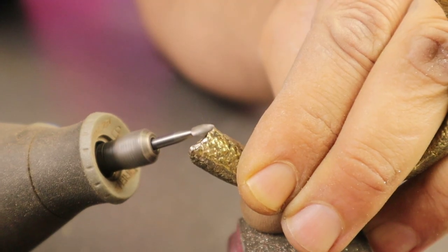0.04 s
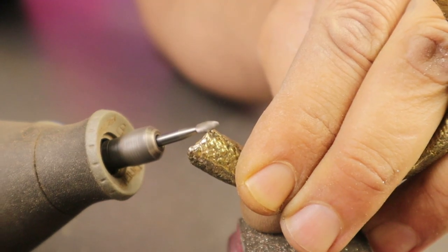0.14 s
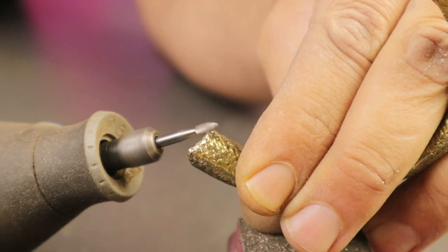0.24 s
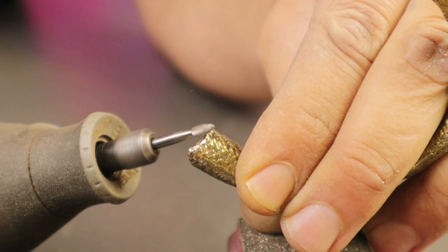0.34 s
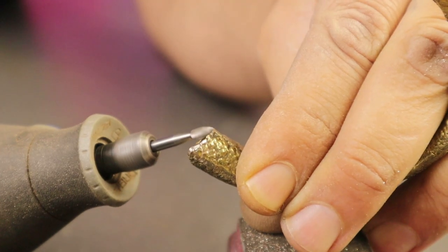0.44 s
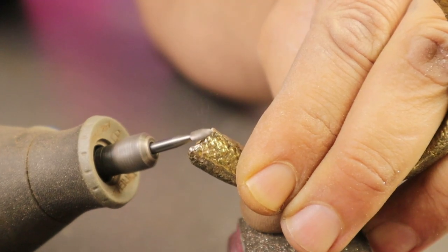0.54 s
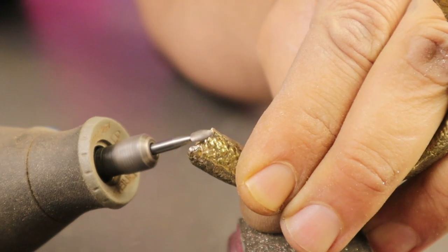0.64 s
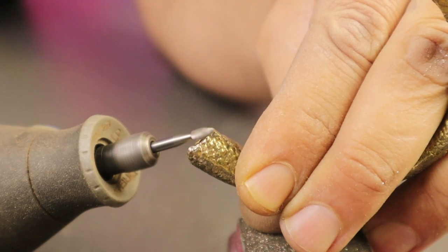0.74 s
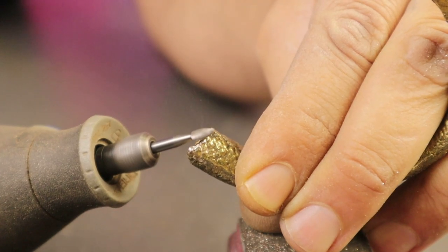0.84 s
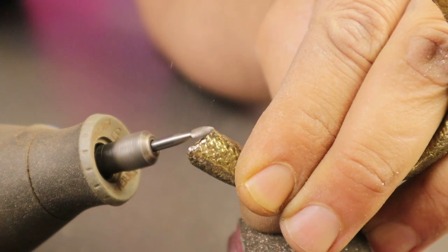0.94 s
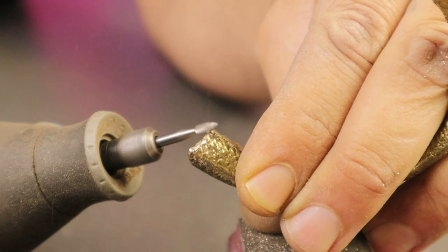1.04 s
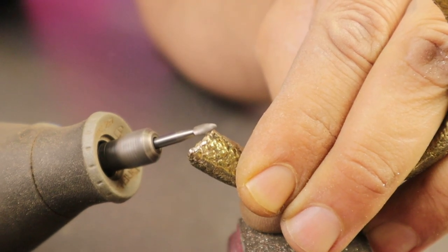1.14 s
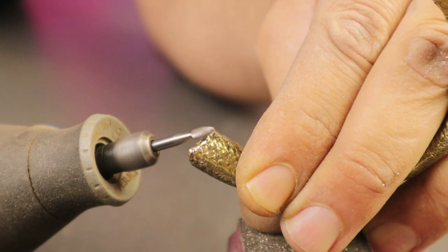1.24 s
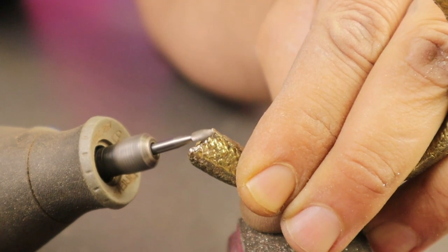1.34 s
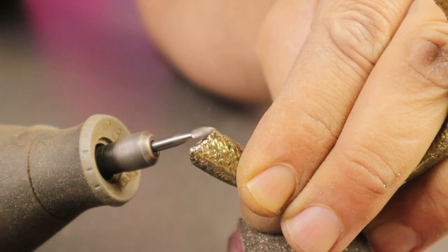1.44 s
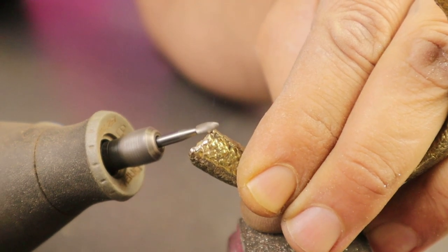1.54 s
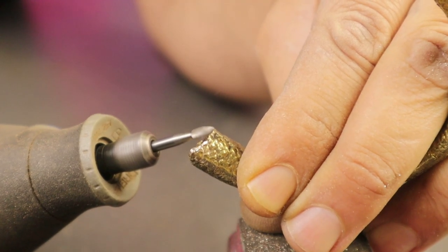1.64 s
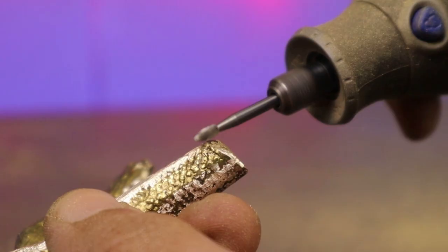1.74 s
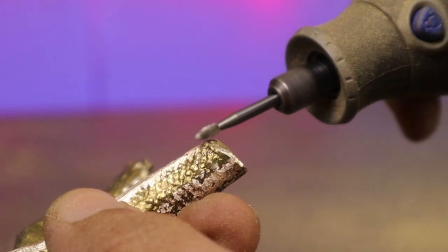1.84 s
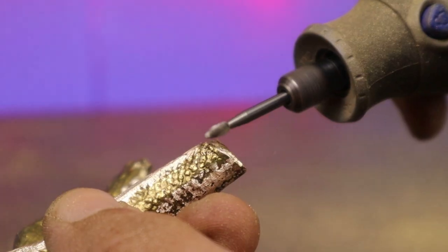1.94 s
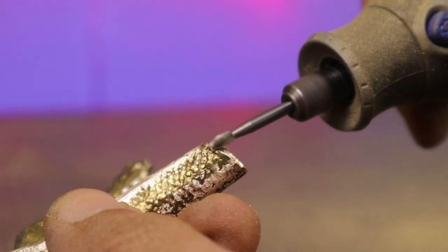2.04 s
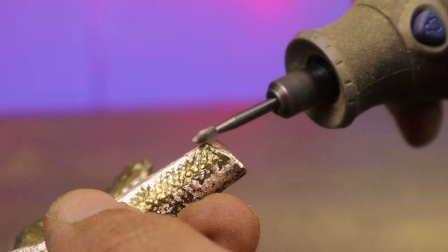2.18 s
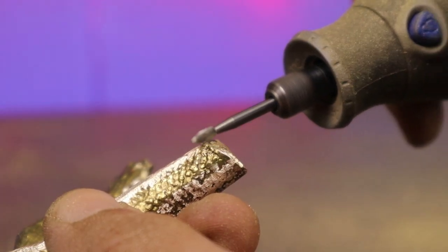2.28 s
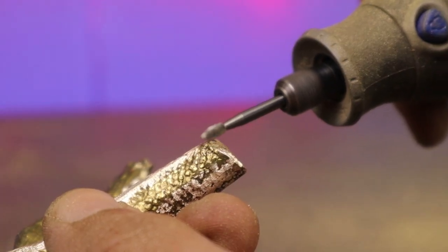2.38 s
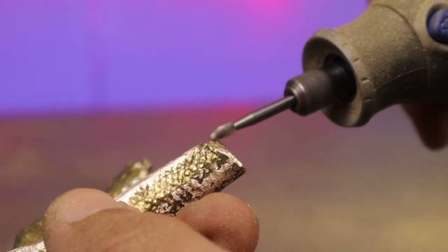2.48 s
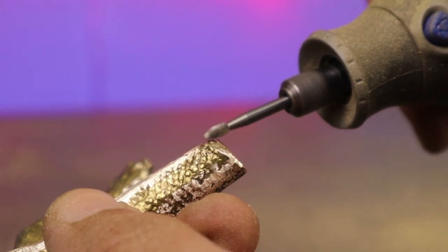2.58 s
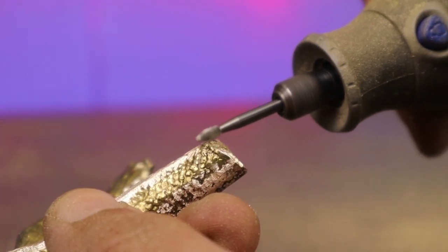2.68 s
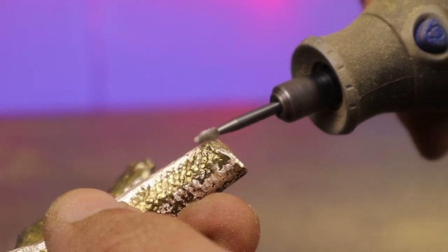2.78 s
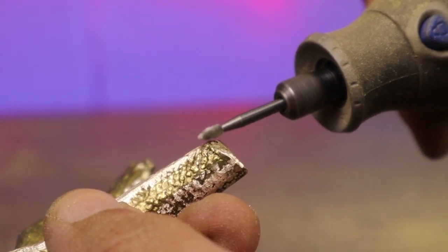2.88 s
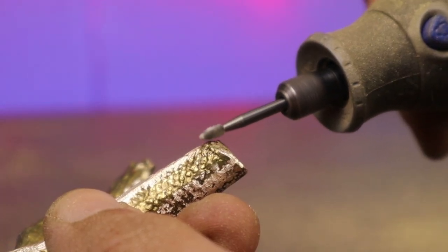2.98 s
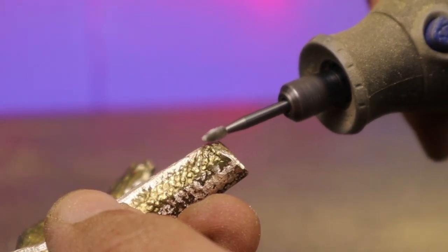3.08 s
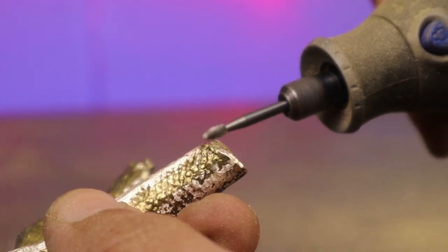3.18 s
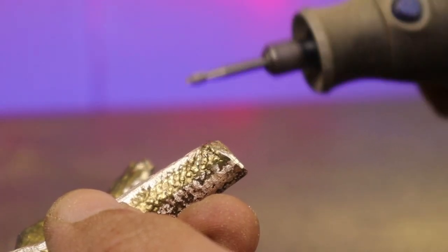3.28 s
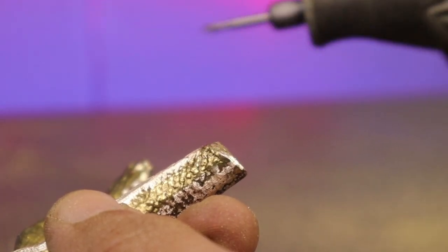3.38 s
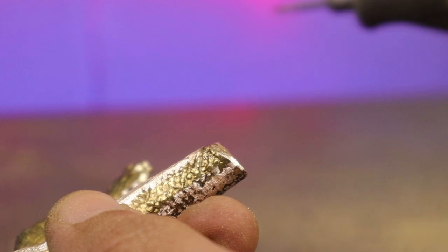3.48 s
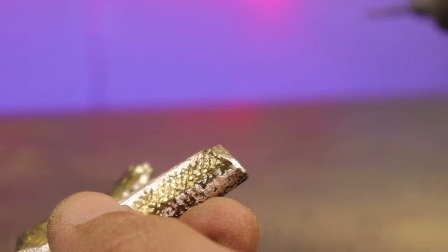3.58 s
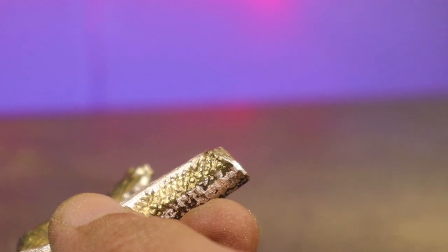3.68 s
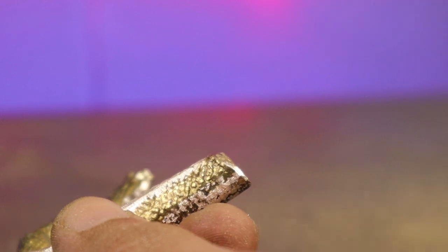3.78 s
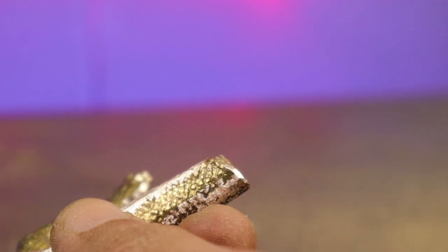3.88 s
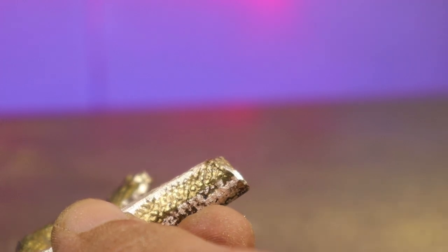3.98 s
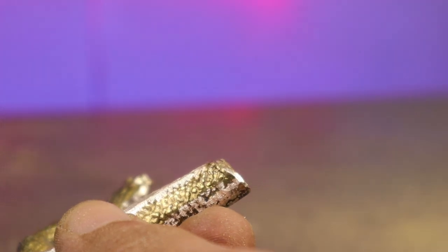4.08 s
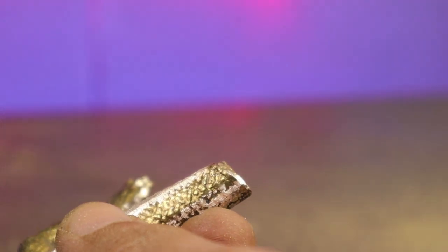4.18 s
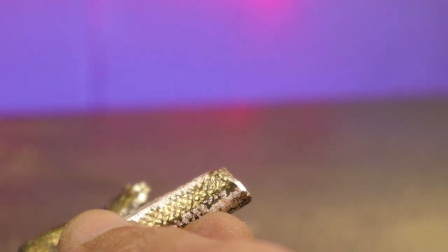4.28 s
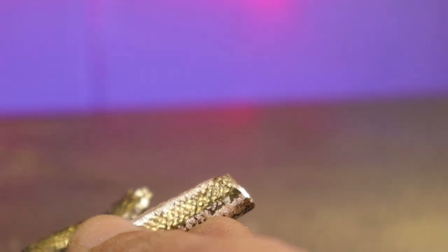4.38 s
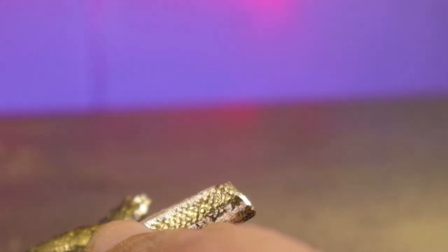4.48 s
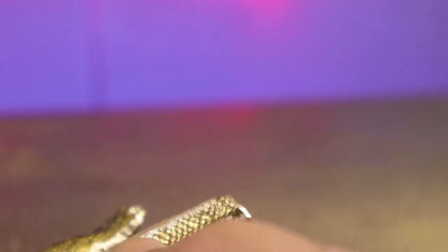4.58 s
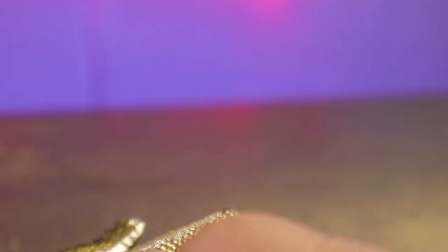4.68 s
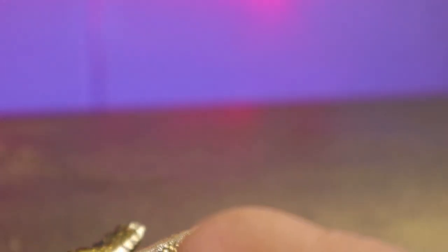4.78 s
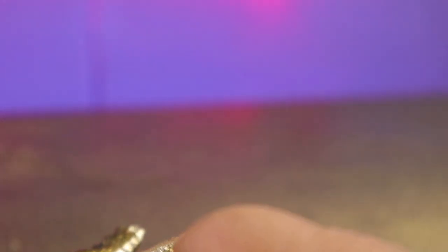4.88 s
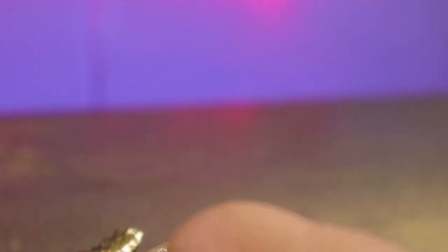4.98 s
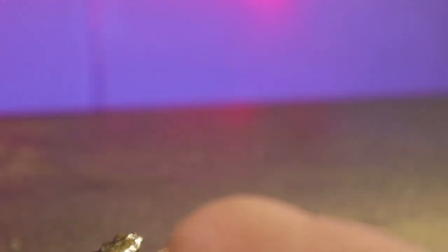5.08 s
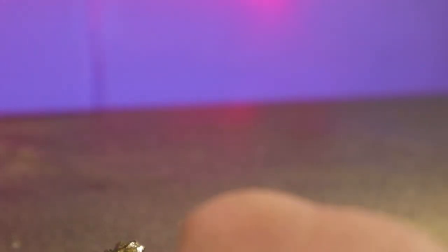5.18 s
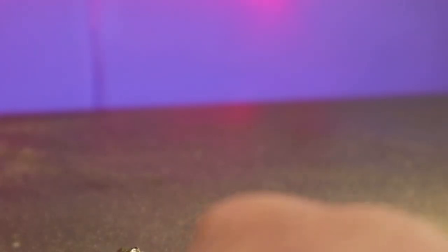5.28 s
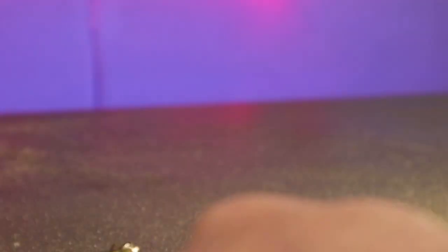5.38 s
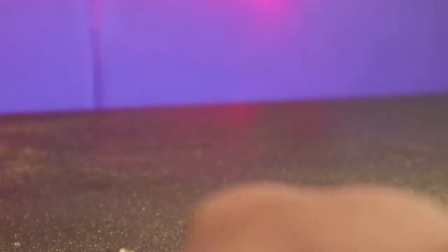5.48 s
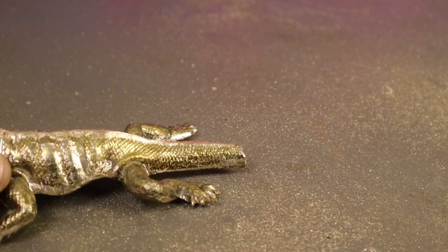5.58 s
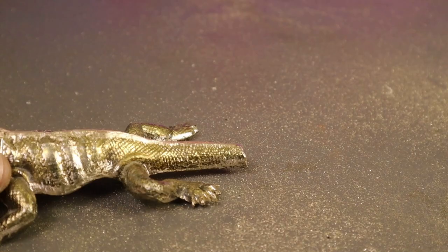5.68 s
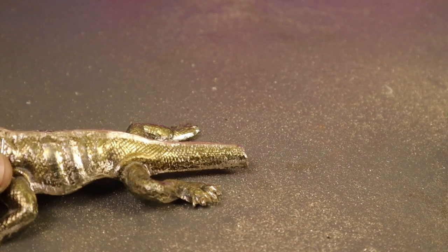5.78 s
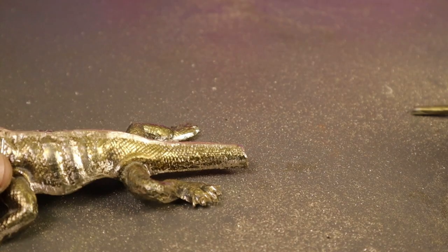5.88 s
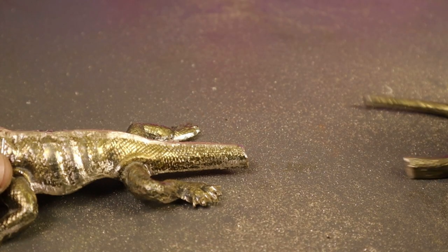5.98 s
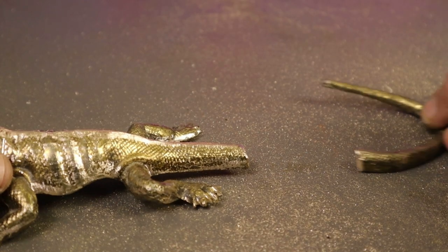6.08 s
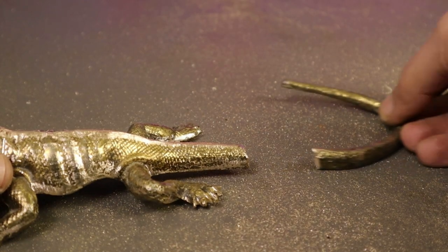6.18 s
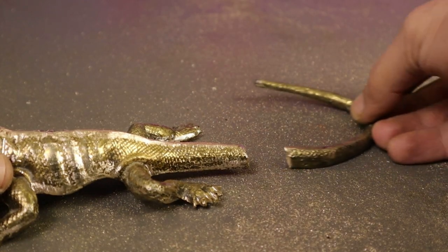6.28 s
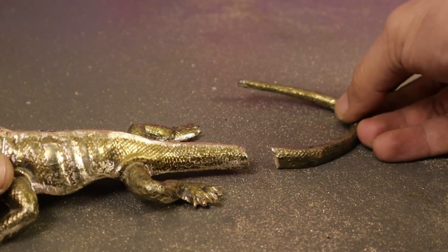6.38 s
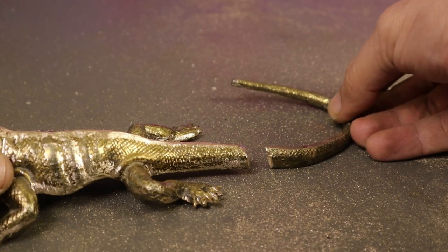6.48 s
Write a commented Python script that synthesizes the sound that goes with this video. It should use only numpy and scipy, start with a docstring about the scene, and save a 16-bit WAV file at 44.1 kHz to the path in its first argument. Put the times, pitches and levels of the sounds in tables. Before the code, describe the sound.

A small, fairly dry workshop, heard close. From 0 s a running handheld rotary tool grinds a brass figure: a loud, rough buzz near 270 turns per second, with treble rasp, metallic ringing and short squeals, pressed in uneven pushes of a tenth to a quarter of a second. A low bump sits under the start. Around 1.75 s the grip changes with a tiny break; the grinding resumes slightly higher, more ringing, with shrill singing tones, strongest near 1.9 and 3.0 s. At about 3.2 s the burr lifts off, leaving steady whine, fan hiss and faint electrical buzz. Switched off at 4.05 s, it glides down in pitch and fades by about 5.5 s. A soft padded thud comes at 4.95 s over quiet room tone. From 5.6 s metal scrapes in short gritty slides, with light knocks growing into hard, rapid clacks around 6.0-6.25 s, and a last few near 6.4 s.

```python
"""A small workshop: a handheld rotary tool grinds the cut end of a small brass figure, held first one way, then another.
The burr strikes once a turn, tears off chips and makes the figure ring; harmonics of the speed sing out at times.
Fan noise, whine and mains buzz come from the tool, which is lifted off, switched off and coasts down; soft bumps
mark hands and tool on the bench. Then figure and loose tail slide over the bench as filtered slips and knock on it,
exciting its decaying modes. A faint coloured noise is the room tone."""
import sys
import numpy as np
from scipy import signal
from scipy.fft import rfft, irfft, next_fast_len
from scipy.io import wavfile
from scipy.ndimage import uniform_filter1d

SR = 44100
rng = np.random.default_rng(int(sys.argv[2]) if len(sys.argv) > 2 else 0)


def pcm_store(signal):
    """Save signal as 16-bit PCM."""
    levels = np.round(np.clip(np.atleast_2d(signal), -1, 1) * 32767)
    wavfile.write(sys.argv[1], SR, levels.astype(np.int16).T)


N = 287973
T = np.arange(N) / SR

LIFT_S, SWITCH_OFF_S = 3.25, 4.06
CUT_ATTACK_S, CUT_RELEASE_S = 0.017, 0.018   # pushes, squeals and locked tones


def from_db(db):
    """Decibels to gain."""
    return 10 ** (np.asarray(db) / 20)


def rms_one(x):
    """Scale to rms 1."""
    return x / np.sqrt(np.mean(x ** 2) + 1e-20)


def steady(x):
    """Divide a sound by its running rms over 59 ms."""
    return x / np.sqrt(np.abs(uniform_filter1d(x ** 2, size=2600)) + 1e-12)


def in_time(rows):
    """A curve of (time, value) at every sample."""
    s, values = np.transpose(rows)
    return np.interp(T, s, values)


def at_hz(points, hz):
    """Read a spectrum on a log-frequency axis."""
    f, db = np.transpose(points)
    return np.interp(np.log(np.maximum(hz, 1)), np.log(f), db)


def colour(x, spectrum):
    """Causal (minimum-phase) filter with the given spectrum."""
    size = 2 * next_fast_len(N // 2 + 4096)
    bins_hz = np.arange(size // 2 + 1) * SR / size
    cepstrum = irfft(np.log(from_db(at_hz(spectrum, bins_hz))))
    # fold the cepstrum to positive time
    cepstrum[1:size // 2] *= 2
    cepstrum[size // 2 + 1:] = 0
    return irfft(rfft(x, size) * np.exp(rfft(cepstrum)))[:N]


def noise():
    """White noise."""
    return rng.standard_normal(N)


def low_pass(x, hz):
    """Second-order low-pass."""
    return signal.sosfilt(signal.butter(2, hz, fs=SR, output="sos"), x + 1e-18)


def split(x, hz, order=4):
    """The parts of a sound below and above a frequency."""
    return [signal.sosfilt(signal.butter(order, hz, kind, fs=SR, output="sos"), x + 1e-18)
            for kind in ("low", "high")]


def drift(rate_hz):
    """Slow chance with rms 1."""
    return rms_one(np.interp(T * rate_hz, np.arange(8000), rng.standard_normal(8000)))


def waver(db, rate_hz):
    """A gain that wanders by so many dB (standard deviation)."""
    steps = np.arange(int(N / SR * rate_hz) + 2)
    return np.interp(T * rate_hz, steps, from_db(db * rng.standard_normal(len(steps))))


def tone(cycles):
    """A cosine that follows a count of cycles."""
    return np.cos((2 * np.pi * (cycles - np.floor(cycles))).astype(np.float32))


def resonate(x, hz, width_hz):
    """One resonance with a peak gain of about 1."""
    r = np.exp(-np.pi * width_hz / SR)
    zeros = np.array([1, 0, -1]) * (1 - r * r) / 2
    poles = [1, -2 * r * np.cos(2 * np.pi * hz / SR), r * r]
    return signal.lfilter(zeros, poles, x + 1e-18)


def ring(clicks, hz, t60_s):
    """A unit click starts a decaying sine of initial height 1."""
    r, w = from_db(-60 / (t60_s * SR)), 2 * np.pi * hz / SR
    return signal.lfilter([0, np.sin(w)], [1, -2 * r * np.cos(w), r * r], clicks + 1e-18)


def clicks_at(times_s, gains):
    """Single-sample clicks."""
    out = np.zeros(N)
    out[np.round(np.asarray(times_s) * SR).astype(int)] = gains
    return out


def fade(clicks, t60_s):
    """Each click starts an exponentially decaying envelope."""
    return signal.lfilter([1], [1, -from_db(-60 / (t60_s * SR))], clicks + 1e-18)


def between(start_s, end_s):
    """Gate with short ramps."""
    rise = np.clip((T - start_s) / 0.0045 + .5, 0, 1)
    fall = np.clip((end_s - T) / .01 + .5, 0, 1)
    return rise * fall


def held(spans, attack_s, release_s):
    """Gain of events (start, end, dB) that rise, hold and die away; the strongest prevails."""
    t, out = T[::20], 1e-6
    for start, end, db in spans:
        rise = np.clip((t - start) / attack_s, 0, 1)
        decay = np.exp(-np.maximum(t - end, 0) / release_s)
        out = np.maximum(out, from_db(db) * rise * decay)
    return np.interp(T, t, out)


def workshop(x, wet_db):
    """Dense reflections of the small room: a decaying noise tail follows the direct sound."""
    t60_s = 0.19
    t = T[:SR // 2]
    tail = rng.standard_normal(len(t)) * from_db(-60 * t / t60_s) * (t > .004)
    return x + from_db(wet_db) * signal.oaconvolve(x, tail / np.linalg.norm(tail))[:N]


def room_tone():
    """Steadily coloured background noise with a slowly changing level."""
    # background level: (time [s], level [dB])
    level_points = [(0, -51.5), (3.4, -57.5), (4.1, -51), (4.9, -50), (5.5, -50), (5.7, -53)]
    # background spectrum: (frequency [Hz], density [dB per Hz])
    spectrum = [(20, -34.5), (60, -3), (100, -6.5), (140, 1), (200, -6), (400, -12), (1800, -23),
                (3000, -27.5), (15800, -34)]
    return from_db(in_time(level_points)) * rms_one(colour(noise(), spectrum))


def bumps():
    """Padded blows of hands and tool on the bench: short thud and tail; the first shakes the bench deeply."""
    # blows: (time [s], level [dB], low-pass corner [Hz])
    blows = [(0.036, -20, 170), (0.073, -25, 400), (1.788, -26, 330), (4.951, -19.5, 600),
             (4.957, -24, 4000), (4.964, -25, 4000), (4.978, -27.5, 2000)]
    # thud spectrum: (frequency [Hz], density [dB per Hz])
    thud_spectrum = [(29, -42), (50, -29.5), (268, -8), (338, -4.5), (825, -15), (898, -19), (1210, -10.5),
                     (1770, -24.5), (2010, -19.5), (8000, -39), (10400, -63.5), (17600, -120)]
    thud, out = rms_one(colour(noise(), thud_spectrum)), 0
    for s, db, corner_hz in blows:
        blow = clicks_at([s], [from_db(db)])
        envelope = fade(blow, 0.039) + 0.26 * fade(blow, 0.34)
        out = out + low_pass(thud * envelope, corner_hz)
    return out + ring(clicks_at([blows[0][0]], [from_db(-34.5)]), 60, 0.31)


def knocks():
    """Each brass knock cracks and rings the bench; hard ones drive the higher modes more, and the room answers."""
    # brass on the bench: (time [s], level [dB], hardness [dB])
    hits = [(5.641, -17.5, -18), (5.734, -13, -15), (5.946, -11, -9), (5.996, -4.5, -12), (6.0794, 1.5, 3),
            (6.094, -7.5, 1.5), (6.151, 1, -6), (6.165, -8, -5), (6.201, -11.5, 0), (6.217, -15, 5.5),
            (6.227, 0, -16), (6.372, -13, -7.5), (6.393, -6, -11), (6.42, -5, -23)]
    # bench modes: (frequency [Hz], level [dB], t60 [s])
    bench = [(338, -19.5, 0.11), (414, -8.5, 0.048), (580, -35, 0.09), (690, -17, 0.053),
             (874, -11.5, 0.042), (1150, -19, 0.037), (1810, -27, 0.082), (2350, -19, 0.06),
             (2780, -45, 0.074), (3890, -18, 0.018)]
    s, db, hard_db = np.transpose(hits)
    chance_db = 2 * rng.standard_normal((len(s), len(bench)))
    modes = 0
    for k, (hz, mode_db, t60_s) in enumerate(bench):
        strike_db = db + mode_db + chance_db[:, k] + hard_db * (hz > 1300)
        modes = modes + (-1) ** k * ring(clicks_at(s, from_db(strike_db)), hz, t60_s)
    hard = clicks_at(s, from_db(db + hard_db))
    crack = 0.61 * ring(hard, 2130, 0.0041) + .5 * ring(hard, 700, 0.015)
    crack = crack + 0.076 * low_pass(noise() * fade(hard, 0.01), 8800)
    room_spectrum = [(100, -11), (400, 3.5), (2500, -7), (5000, -26.5), (14000, -40)]   # (Hz, dB)
    room = rms_one(colour(noise(), room_spectrum)) * fade(hard, 0.24)
    return from_db(-5.5) * modes + crack + from_db(-23) * room


def sliding():
    """Rough brass catches on the gritty bench top in dense small slips and rings faintly."""
    # shoves over the bench: (start [s], end [s], level [dB])
    shoves = [(5.59, 5.69, -42.5), (5.617, 5.655, -37.5), (5.72, 5.77, -34), (5.8, 5.92, -31.5),
              (5.938, 6.1, -26.5), (6.15, 6.33, -27.5), (6.37, 6.465, -32), (6.495, 6.53, -42)]
    # friction spectrum: (frequency [Hz], density [dB per Hz])
    spectrum = [(47, -71), (80, -33.5), (449, -1), (714, -10), (871, -10), (1090, -17.5), (1930, -20.5),
                (3280, -30.5), (3740, -35.5), (8120, -39), (11600, -47.5), (13500, -46), (15800, -80)]
    # thin ring of the sliding metal: (frequency [Hz], width [Hz], level [dB])
    brass = [(3560, 120, -24.5), (6850, 180, -43), (9300, 43, -34.5), (13600, 170, -34)]
    slips_per_s = 1500
    treble_db, treble_follows = -11, 0.33   # treble share in the hardest shove; softer ones are duller
    level = held(shoves, attack_s=0.026, release_s=0.082)
    treble = from_db(treble_db) * (level / level.max()) ** treble_follows
    sizes = from_db(2 * np.minimum(rng.exponential(1, N), 4))
    slips = (rng.random(N) < slips_per_s / SR) * noise() * sizes
    friction = (rms_one(slips) + 0.83 * noise()) * waver(2.0, 70)
    low, high = split(colour(friction, spectrum), 1240)
    metal = sum(from_db(db) * rms_one(resonate(friction, hz, width_hz)) for hz, width_hz, db in brass)
    return level * (steady(low) + treble * steady(high) + metal)


def spindle():
    """Turns per second: varying under load, then braked by bearing friction and speed-proportional drag."""
    # powered speed in the first grip: (time [s], speed [turns/s])
    first_run = [(0.0, 277.8), (0.33, 277.7), (0.648, 269.5), (0.692, 264.0), (0.73, 271.5), (0.77, 266.7),
                 (1.32, 266.8), (1.344, 268.9), (1.75, 269.9)]
    # powered speed in the second grip: (time [s], speed [turns/s])
    second_run = [(1.8, 277.6), (2.006, 280.1), (2.33, 276.0), (2.544, 280.4), (2.582, 276.4),
                  (3.172, 277.5), (3.2, 273.2)]
    # powered speed off the metal: (time [s], speed [turns/s])
    free_run = [(3.34, 276.6), (3.566, 276.6), (4.0, 278.9)]
    friction_hz_per_s, drag_per_s = 168, .245
    powered_hz = in_time(np.vstack([first_run, second_run, free_run]))
    brake_hz = friction_hz_per_s / drag_per_s
    coasting = np.exp(-drag_per_s * np.maximum(T - SWITCH_OFF_S, 0))
    return np.maximum((powered_hz + brake_hz) * coasting - brake_hz, 1)


def fan(pace):
    """Turbulent fan air, whose mid band and hiss weaken as the rotor slows."""
    # air spectrum: (frequency [Hz], density [dB per Hz])
    spectrum = [(100, -38), (250, -19), (500, -6), (1050, 1.5), (1800, -3), (2800, -1.5), (4500, -4),
                (5400, -6.5), (7200, 1.5), (8800, -1), (10000, -7), (13000, -9), (15800, -12)]
    hiss_db, mid_power, hiss_power = -2.7, 0.34, 1   # powers of the speed
    rest, hiss = split(rms_one(colour(noise(), spectrum)), 4800)
    low, mid = split(rest, 1740)
    air = low + mid * pace ** mid_power + from_db(hiss_db) * pace ** hiss_power * hiss
    return air * waver(0.42, 65)


def rotor_whine(speed, turns):
    """Rotor and commutator tones at multiples of the speed, radiated by the housing."""
    # whine partials: (multiple of the speed [1], level [dB])
    partials = [(1, -22), (2, -14.5), (3, -31.5), (4, -38), (6, -27), (8, -8.5), (9, -1.5), (12, -28),
                (15, -17), (16, -18.5), (18, -10), (20, -29), (22, -22), (24, -10), (28, -20.5), (30, -26),
                (32, -21.5), (34, -21), (36, -15), (40, -19), (44, -20)]
    # how well the housing radiates: (frequency [Hz], gain [dB])
    housing = [(150, -10), (280, -2.5), (600, -35), (1500, -3), (2400, -16.5), (3450, 8.5), (4300, -6),
               (5000, -2), (5600, 0), (6700, -4.5), (7800, 9.5), (9200, 5), (11000, -14)]
    # one partial swells as the tool is turned in the hand: (start [s], end [s], rise [dB])
    swells = [(.5, 1.76, 10), (1.95, 2.1, 4), (3.31, 3.54, 12), (3.57, 4.2, 11), (4.86, 4.96, 13)]
    swelling_multiple = 18
    swell = np.maximum(1, held(swells, attack_s=0.039, release_s=0.012))
    whine = 0
    for k, db in partials:
        gain = np.interp(T, T[::200], from_db(db + at_hz(housing, k * speed[::200])))
        partial = gain * waver(2.0, 25) * tone(k * turns)
        whine = whine + partial * (swell if k == swelling_multiple else 1)
    return workshop(whine, wet_db=-4)


def mains_buzz():
    """The speed control fires every half wave of the mains, a little early or late as the load changes."""
    # the buzz swells: (start [s], end [s], rise [dB])
    swells = [(0.0, 3, 4), (3.77, 3.98, 5.5)]
    half_waves_hz = 100
    firings = np.diff(np.floor(T * half_waves_hz + .04 * drift(4) + .007 * drift(70)), prepend=0)
    buzz = rms_one(resonate(resonate(firings, 2290, 460), 2190, 470)) * between(-1, SWITCH_OFF_S)
    return buzz * np.maximum(1, held(swells, attack_s=0.039, release_s=0.012))


def motor(speed, turns):
    """Fan air, whine and buzz share a level that dies with the speed."""
    fan_db, knee_hz, fan_power = -28, 151, 1.65   # below the knee the level falls as this power of speed
    working_gain_db = 0.8   # a little louder while held down at the figure
    dullest_speed_hz = 114   # below this the air gets no duller
    whine_db, coasting_whine_db, buzz_db = -1.5, -5.5, -11.5   # relative to the air
    whine_change_s = 0.5   # from one whine level to the other after switching off
    whine_lingers = 0.19   # the whine stands out of the dying air by this power of the slowing
    level = from_db(fan_db + working_gain_db * between(-1, LIFT_S))
    level = level / np.hypot(1, (knee_hz / speed) ** fan_power)
    pace = np.maximum(speed, dullest_speed_hz) / speed.max()
    whining_db = np.interp(T - SWITCH_OFF_S, [0, whine_change_s], [whine_db, coasting_whine_db])
    whining = from_db(whining_db) / pace ** whine_lingers
    return level * (fan(pace) + whining * rotor_whine(speed, turns) + from_db(buzz_db) * mains_buzz())


def hopping():
    """Gain of the cut: pushed too hard, the burr hops on the metal."""
    # hops: (start [s], end [s], rate [hops/s], swing [dB])
    hops = [(.145, 0.196, 131, 4.5), (1.856, 2, 77, 3)]
    return from_db(sum(between(start, end) * swing_db * (tone(hz * (T - start)) - .25)
                       for start, end, hz, swing_db in hops))


def singing(turns):
    """Chatter locked onto one multiple of the speed: clear unsteady tones, pulsed once a turn."""
    # locked tones: (start [s], end [s], multiple of the speed [1], rms level [dB])
    locks = [(-.02, 0.175, 12, -35.5), (.09, .185, 14, -22.5), (0.2, 0.406, 6, -33.5),
             (1.797, 1.867, 1, -31.5), (1.846, 1.988, 14, -22.5), (2.188, 2.285, 10, -24.5),
             (2.284, 2.48, 14, -29), (2.696, 2.943, 14, -41), (2.964, 3.153, 14, -20.5),
             (2.98, 3.14, 13, -33)]
    depth = .5
    tones = 0
    for start, end, k, db in locks:
        gain = held([(start, end, db)], CUT_ATTACK_S, CUT_RELEASE_S) * waver(4.4, 60)
        tones = tones + gain * np.sqrt(2) * tone(k * turns)
    return (1 + depth * tone(turns - .25)) * tones


def bite(turns, speed_ratio, strike, rasp, modes, uneven_db, bounce_db, bounce_hz, contact, rub,
         rasp_db, ring_db, smear, shift_db):
    """Once a turn the burr strikes and tears off chips with uneven, bouncing force; both ring the figure."""
    bounces = tone(np.cumsum(bounce_hz * (1 + 0.148 * drift(40))) / SR)
    turn_db = uneven_db * rng.standard_normal(4000)[turns.astype(int)]
    force = from_db(turn_db + bounce_db * bounces) * waver(0.71, 38)
    force = low_pass(force, 1500)
    # the body colour stays put: each partial slides through it as the speed changes
    multiples, strike_db = np.transpose(strike)
    gains = from_db(np.interp(np.outer(multiples, speed_ratio[::100]), multiples, strike_db))
    blow = 0
    for k, gain in zip(multiples, gains):
        # smear spreads the strike over part of the turn; levels shift as the burr wanders over the metal
        partial = tone(k * (turns - .35 + smear * k / 100))
        blow = blow + np.repeat(gain, repeats=100)[:N] * waver(shift_db, 9) * partial
    blow = rms_one(force * blow)
    contact_pulse = np.exp(-((turns % 1 - .25) / contact) ** 2)
    chips = force * noise() * (rub + contact_pulse)
    rasping = rms_one(colour(chips, rasp))
    drive = rms_one(chips) + blow / 2
    ringing = rms_one(sum(from_db(db) * resonate(drive, hz, width_hz) for hz, width_hz, db in modes))
    return split(blow + from_db(rasp_db) * rasping + from_db(ring_db) * ringing, 190)[1]


def press(sound, treble_db, body_db, mid_db, edge_hz):
    """Pressure sets the level; when the figure slips in the fingers, body tones and mid ring sing out."""
    # burr pushed into the brass: (start [s], end [s], pressure [dB])
    pushes = [(-.03, .08, -19), (.075, .18, -16.5), (.205, .27, -18.5), (.27, .33, -23.5), (.34, .535, -21),
              (.588, .78, -16.5), (.77, .9, -18.5), (.895, 1.115, -17), (1.135, 1.21, -19),
              (1.2, 1.25, -26), (1.268, 1.297, -23), (1.342, 1.445, -20.5), (1.465, 1.52, -21),
              (1.505, 1.598, -17), (1.622, 1.67, -16), (1.68, 1.715, -19.5), (1.778, 1.988, -16.5),
              (2.084, 2.3, -22), (2.295, 2.36, -17.5), (2.4, 2.488, -18.5), (2.52, 2.55, -25.5),
              (2.58, 2.622, -18.5), (2.655, 2.94, -19), (2.93, 3.145, -18.5), (3.14, 3.217, -20.5)]
    # squeals: (start [s], end [s], body tone [dB], mid ring [dB])
    squeals = [(0.107, 0.198, -61, -27.5), (0.398, 0.522, -36, -28.5), (1.052, 1.107, -44, -24.5),
               (1.483, 1.567, -35, -29), (1.788, 1.848, -15, -16.5), (2.114, 2.206, -21, -48),
               (2.193, 2.276, -17.5, -23), (2.369, 2.417, -20.5, -28), (3.138, 3.186, -21, -37)]
    skim_db = -33   # between pushes the burr still skims the metal
    pressure = np.maximum(held(pushes, CUT_ATTACK_S, CUT_RELEASE_S), from_db(skim_db))
    body_squeal = held([(start, end, db) for start, end, db, _ in squeals], CUT_ATTACK_S, CUT_RELEASE_S)
    mid_squeal = held([(start, end, db) for start, end, _, db in squeals], CUT_ATTACK_S, CUT_RELEASE_S)
    low, rest = split(sound, 2240)
    mid, high = split(rest, edge_hz, order=8)
    return (from_db(treble_db) * pressure * steady(high)
            + np.hypot(from_db(body_db) * pressure, body_squeal) * steady(low)
            + np.hypot(from_db(mid_db) * pressure, mid_squeal) * steady(mid))


def grinding(speed, turns):
    """In the first grip the figure is tightly damped; in the second its end rings."""
    # strike of one turn, first grip: (multiple of the speed [1], level [dB])
    first_strike = [(1, -17.5), (2, -7), (3, 0), (4, 7.5), (5, -2.5), (6, -3), (7, -16.5), (8, -30),
                    (9, -3.5), (10, -38), (11, -2.5), (12, -6.5), (13, -3), (14, 1), (15, -23.5),
                    (16, -2.5), (17, -1.5), (18, -17), (19, 1), (20, -11.5), (21, -1), (22, -1), (23, -1.5),
                    (24, -11), (25, -22.5), (26, 2), (27, -4), (28, -15.5)]
    # strike of one turn, second grip: (multiple of the speed [1], level [dB])
    second_strike = [(1, -23), (2, -13.5), (3, -6.5), (4, -4.5), (5, -32), (6, 10), (7, -4.5), (8, -4.5),
                     (9, -12.5), (10, -2.5), (11, -9.5), (12, -9.5), (13, -10.5), (14, -3.5), (15, -16.5),
                     (16, -8), (17, -17.5), (18, -30.5), (19, -19), (20, -10.5), (21, -12), (22, -13),
                     (23, -32), (24, -24), (25, -8), (26, -9.5)]
    # rasp of the chips, first grip: (frequency [Hz], density [dB per Hz])
    first_rasp = [(200, -55), (500, -22), (1100, 13.5), (1900, -34.5), (3200, -19.5), (4000, 2),
                  (4600, -0.5), (5350, -7.5), (6100, 7), (7200, -16), (7800, -23.5), (10800, -9.5),
                  (12200, -13), (15500, -28.5)]
    # rasp of the chips, second grip: (frequency [Hz], density [dB per Hz])
    second_rasp = [(130, -54), (300, 2.5), (450, -5.5), (1100, 0.5), (2300, -9), (3900, 2), (4700, 0),
                   (6900, 3), (7700, -5.5), (9000, 1), (9800, -11), (11400, -12.5), (11800, -15),
                   (15500, -19.5)]
    # resonances of the figure, first grip: (frequency [Hz], width [Hz], level [dB])
    first_modes = [(543, 12, 5), (790, 48, -11.5), (1040, 12, -13.5), (1664, 32, 6), (2450, 7.7, 14),
                   (2950, 53, 0), (3720, 10, -24), (3810, 84, 0), (4570, 43, -8.5), (4680, 54, -9.5),
                   (4776, 200, 0.5), (6370, 660, 2), (6890, 110, -7), (11910, 360, -7.5)]
    # resonances of the figure, second grip: (frequency [Hz], width [Hz], level [dB])
    second_modes = [(269, 34, -8.5), (1723, 7.3, 18), (2730, 16.4, 5.5), (3024, 22, -2.5),
                    (3813, 100, -5.5), (4160, 15, -0.5), (4435, 20, -10), (11680, 76, -8)]
    first_speed_hz, second_speed_hz = 266.7, 276.9   # speeds at which the strike tables hold
    regrip_s = 1.765
    # contact: width of the bite in turns; rub: share of steady rubbing
    first = bite(turns, speed / first_speed_hz, first_strike, first_rasp, first_modes,
                 uneven_db=2.0, bounce_db=2, bounce_hz=121.3, contact=0.064, rub=0.49,
                 rasp_db=-6, ring_db=1.5, smear=0.488, shift_db=3.5)
    second = bite(turns, speed / second_speed_hz, second_strike, second_rasp, second_modes,
                  uneven_db=2.0, bounce_db=1.0, bounce_hz=76.1, contact=0.21, rub=0.48,
                  rasp_db=-4.5, ring_db=1.5, smear=0.544, shift_db=5.5)
    first = press(first, treble_db=-2.12, body_db=-9.5, mid_db=-7.5, edge_hz=4260)
    second = press(second, treble_db=-0.34, body_db=-3.5, mid_db=-13, edge_hz=3440)
    return first * between(-1, regrip_s) + second * between(regrip_s, LIFT_S)


def scene():
    """One spindle speed drives both the motor and the burr."""
    speed = spindle()
    wobble = 0.001 * drift(40) + .003 * (T > SWITCH_OFF_S) * drift(130)   # unpowered, it runs less evenly
    turns = np.cumsum(speed * (1 + wobble)) / SR
    cut = hopping() * (grinding(speed, turns) + singing(turns))
    bench_knocks = split(knocks(), 170, order=2)[1]
    mix = room_tone() + bumps() + bench_knocks + sliding() + motor(speed, turns) + workshop(cut, wet_db=-12.5)
    return mix[None]


def record(dry):
    """The highest peaks are clipped, then the top is cut."""
    cutoff_hz = 15780
    top_cut = signal.ellip(12, .1, 90, cutoff_hz, fs=SR, output="sos")
    return signal.sosfilt(top_cut, np.clip(dry, -1, 1))


dry = scene()
out = record(dry)
pcm_store(out)
```